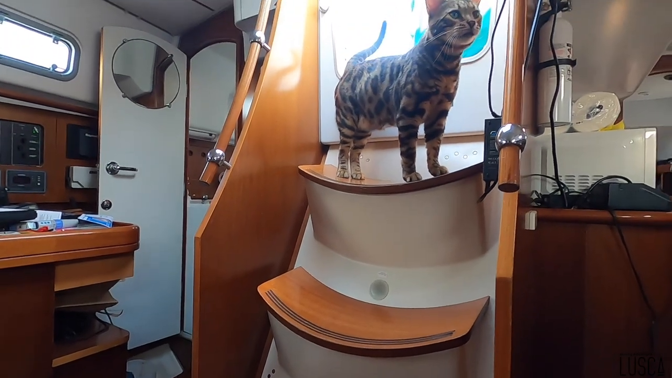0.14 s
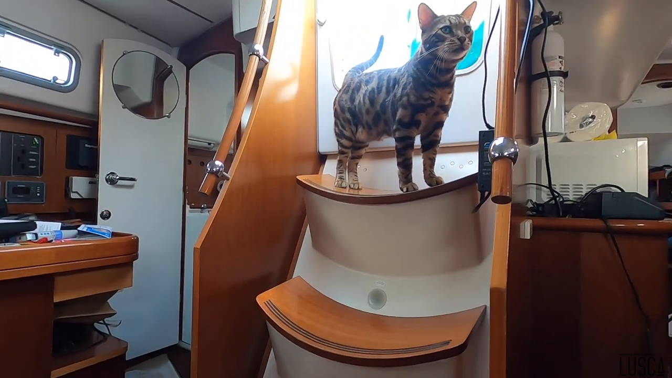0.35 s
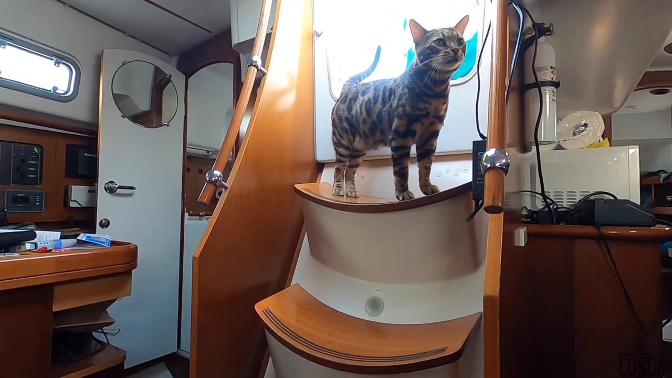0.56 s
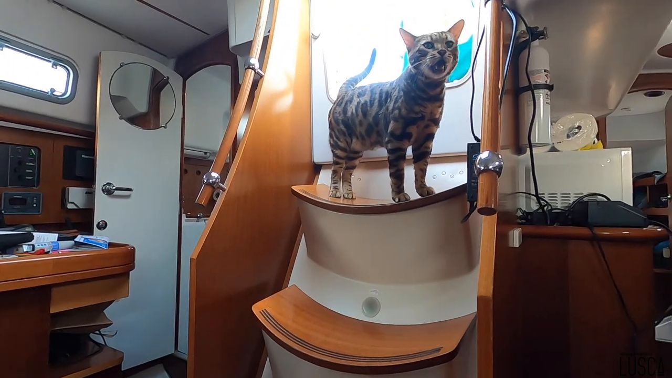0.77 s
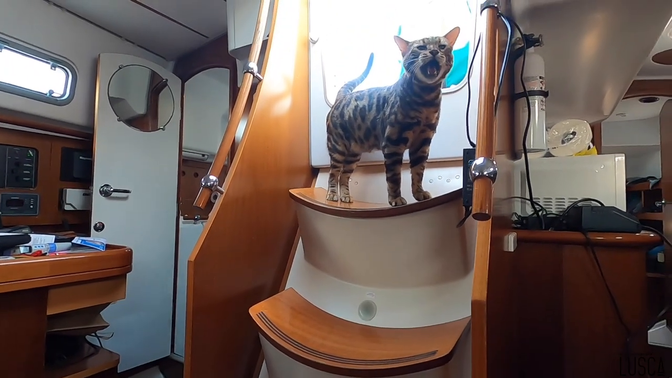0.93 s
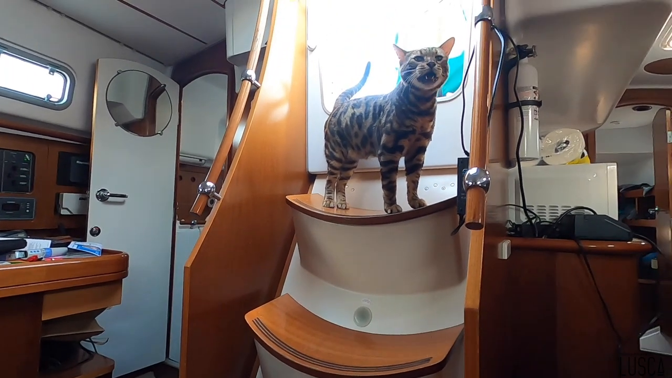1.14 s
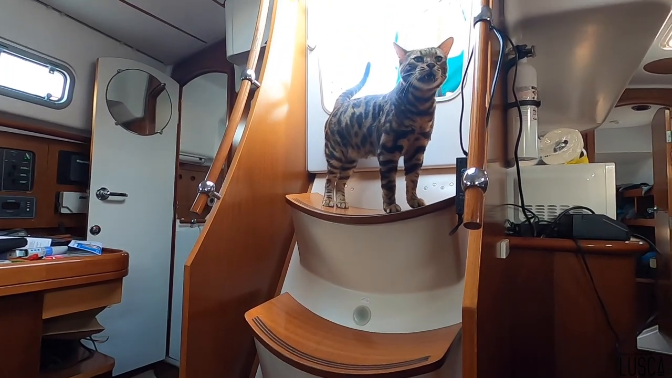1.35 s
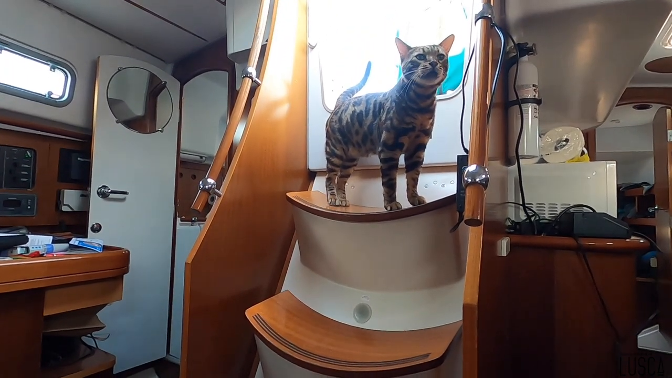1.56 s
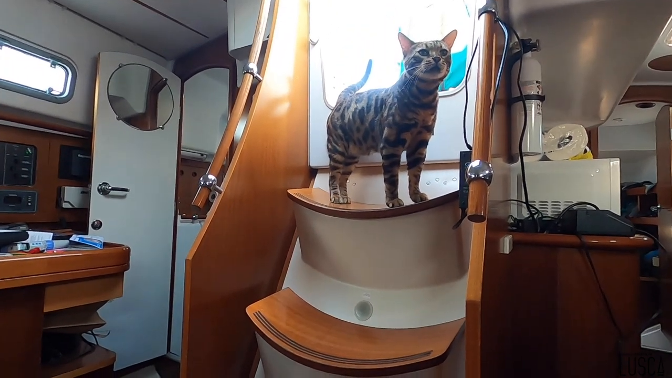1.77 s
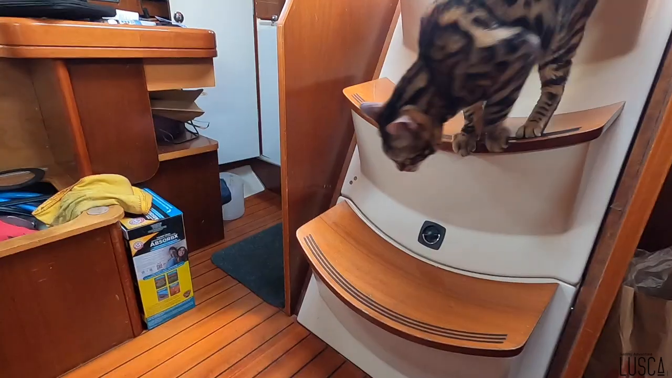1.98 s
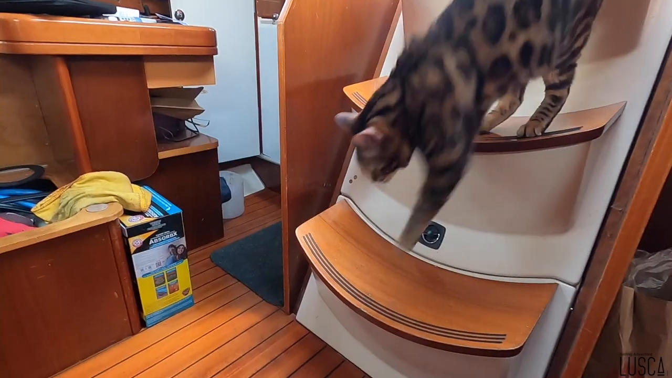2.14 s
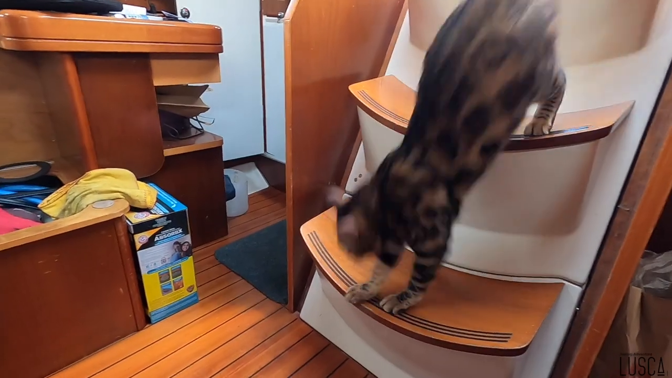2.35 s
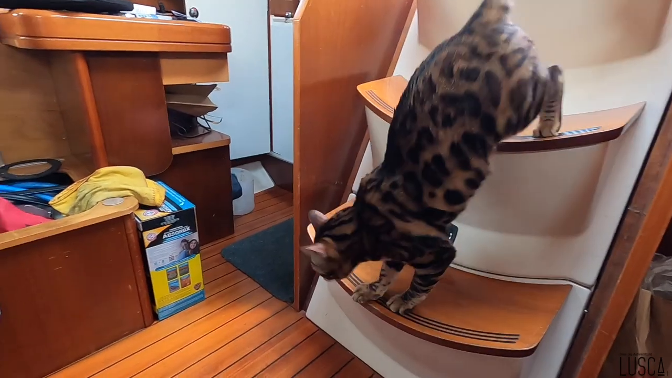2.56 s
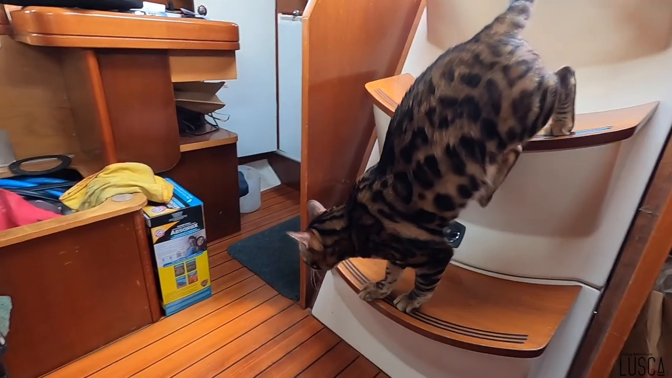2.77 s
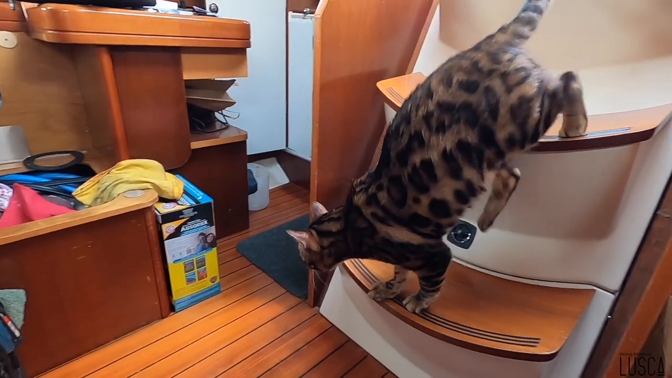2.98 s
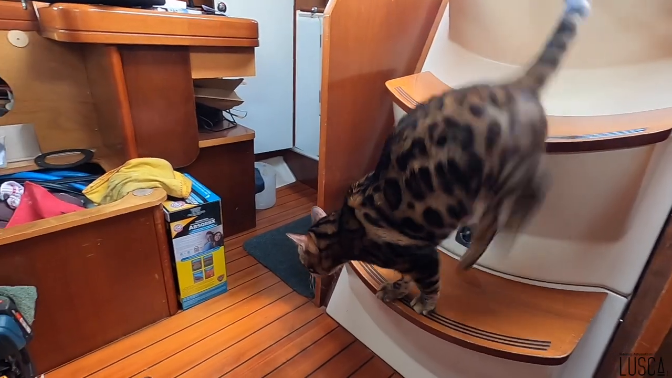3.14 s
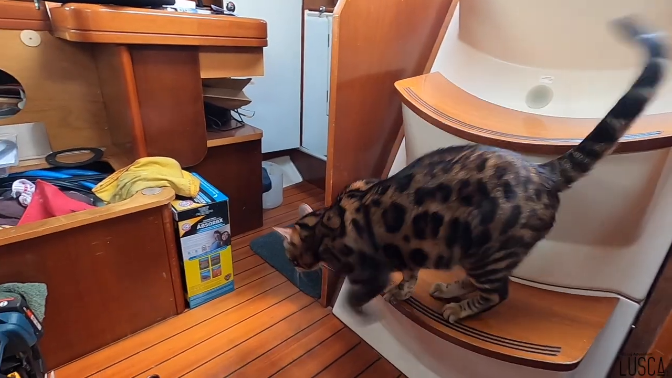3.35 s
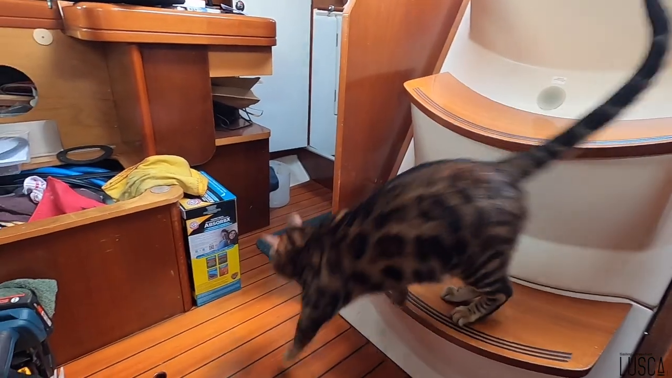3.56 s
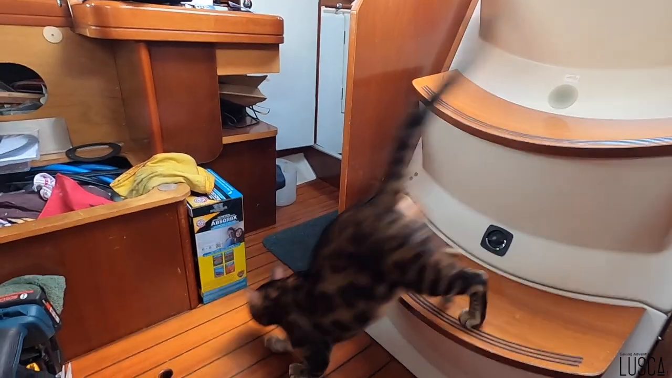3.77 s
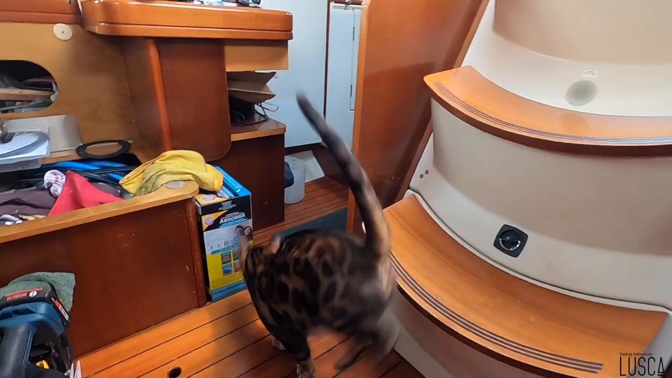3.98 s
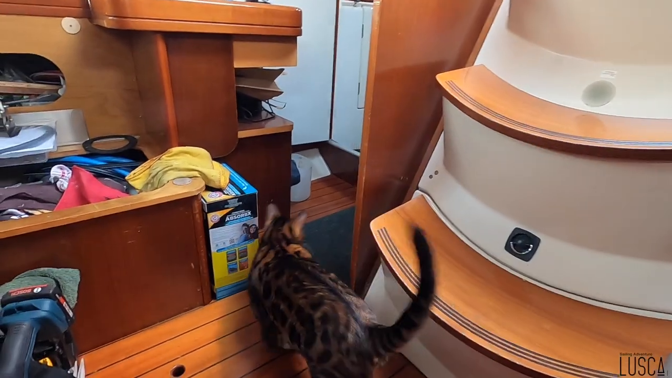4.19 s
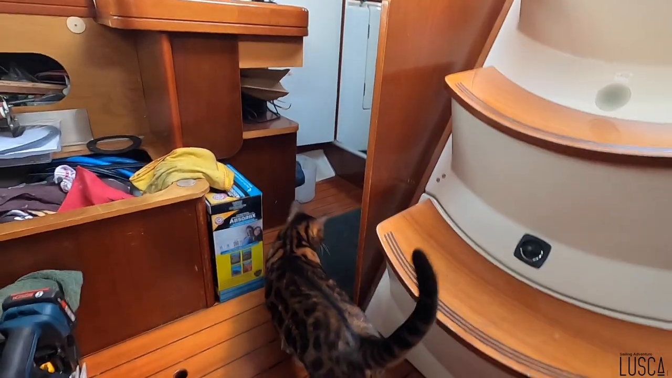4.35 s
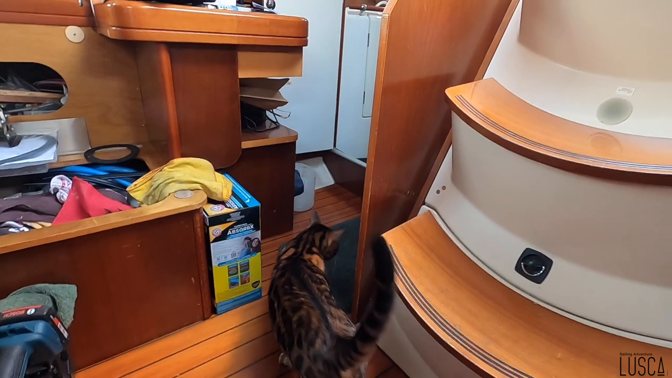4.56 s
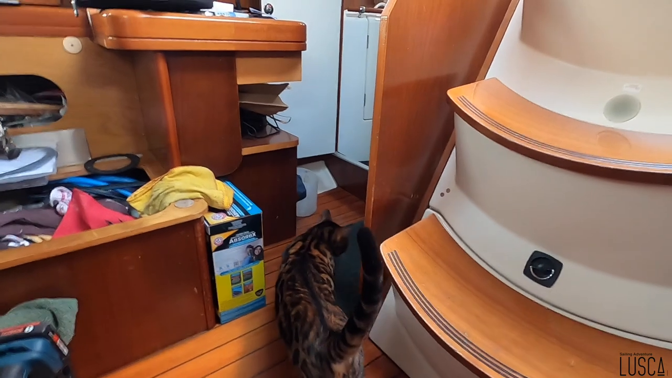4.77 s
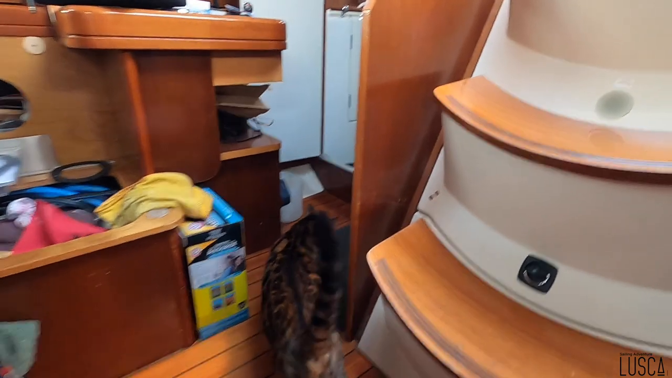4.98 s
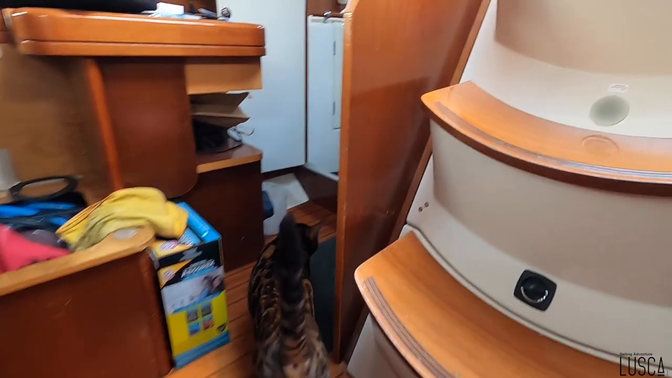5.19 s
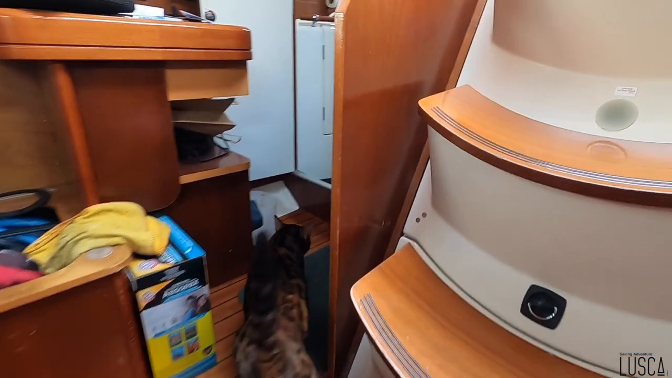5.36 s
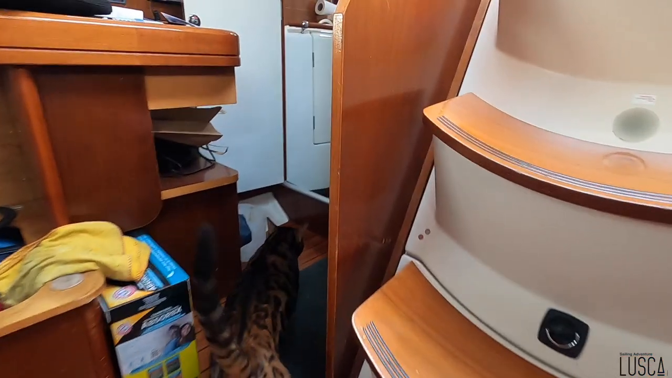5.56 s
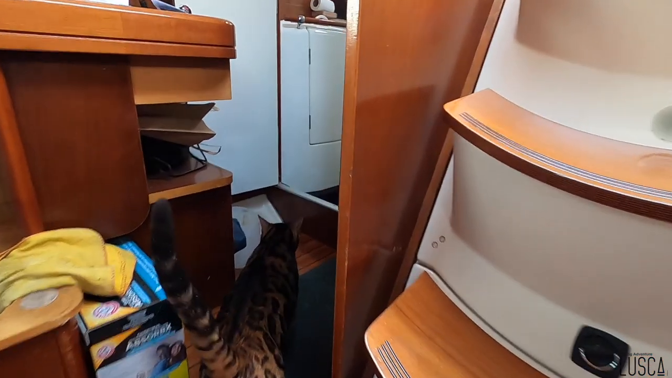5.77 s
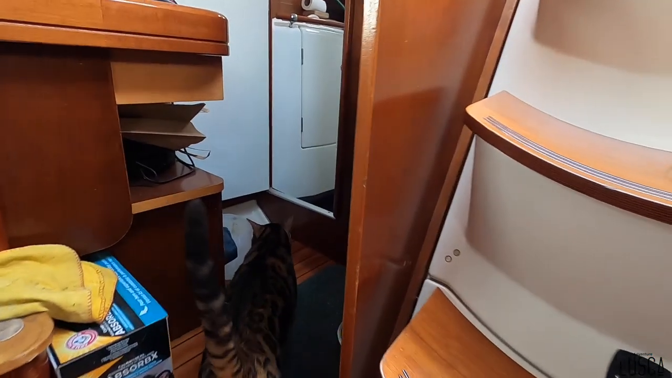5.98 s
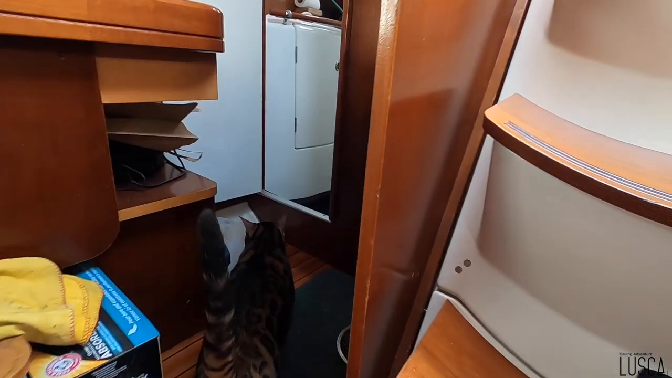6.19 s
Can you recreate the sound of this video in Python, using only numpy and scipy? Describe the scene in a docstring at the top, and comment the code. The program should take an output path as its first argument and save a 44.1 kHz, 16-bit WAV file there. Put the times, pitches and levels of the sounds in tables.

```python
"""One long meow rings in a small wooden boat cabin; after a short near-silence the cat climbs down the steps.
Paws thud on hollow boards (damped modes), claws and loose things tick, dry scrapes rasp, woodwork knocks.
The meow is a stack of harmonics through a moving mouth; a machine hums under coloured hiss and cloth rustle.
Handling rumbles in the bass, and the stereo picture folds nearly to mono for a while.
Source levels are set ahead of the final gain in record()."""
import sys
import numpy as np
from scipy import signal
from scipy.fft import rfft, irfft, next_fast_len
from scipy.io import wavfile
from scipy.ndimage import uniform_filter1d

SR = 44100
rng = np.random.default_rng(int(sys.argv[2]) if len(sys.argv) > 2 else 0)


def transcribe(signal):
    """Save signal, clipped to [-1, 1], as a 16-bit WAV file at the path in sys.argv[1]."""
    frames = np.atleast_2d(signal).T
    limited = np.clip(frames, -1, 1)
    pcm = np.round(limited * 32767).astype(np.int16)
    wavfile.write(sys.argv[1], SR, pcm)


N = 274724  # samples


def amp(db):
    """Decibels to linear gain."""
    return 10 ** (np.asarray(db) / 20)


def evened(x):
    """Scales a signal to an RMS of 1."""
    return x / np.sqrt(np.mean(x ** 2) + 1e-20)


def smooth_noise(count, size, passes=1):
    """Slow random drift at RMS 1: white noise averaged over size samples, once or more."""
    drift = rng.standard_normal(count)
    for _ in range(passes):
        drift = uniform_filter1d(drift, size)
    return evened(drift)


def levelled(x):
    """Takes out most of the chance swells of narrow noise."""
    envelope = abs(signal.hilbert(x, next_fast_len(N))[:N])
    return x / (envelope + .5)


def read(points, hz):
    """Value of a spectrum table on a log-frequency axis."""
    f, value = np.transpose(points)
    return np.interp(np.log(hz + 1), np.log(f + 1), value)


def along(rows):
    """Columns of a time curve, one value a sample."""
    s, *columns = np.transpose(rows)
    return [np.interp(np.arange(N) / SR, s, c) for c in columns]


def add(mix, s, sound):
    """Lays a sound into the mix at s seconds."""
    part = mix[round(s * SR):][:len(sound)]
    part += sound[:len(part)]


def peak(f, hz, width):
    """Complex gain of a resonance at frequency f, 1 at its centre."""
    return 1j * width * hz / (hz ** 2 - f ** 2 + 1j * width * f)


def band(x, hz, width):
    """A resonance applied twice."""
    b, a = signal.iirpeak(min(hz, SR / 2.2), hz / width, SR)
    return signal.lfilter(b, a, signal.lfilter(b, a, x))


def coloured(x, tone):
    """Filters by a spectrum table."""
    size = next_fast_len(N + 2048)
    gain = amp(read(tone, np.fft.rfftfreq(size, 1 / SR)))
    return irfft(rfft(x, size) * gain, size)[..., :N]


def noise(tone, patchy_db):
    """Two-channel noise of a given spectrum with drifting patches, its sides partly alike."""
    # left-right likeness: (frequency [Hz], correlation, held within -1 to 1)
    likeness = [(60, -0.65), (180, 0.34), (550, 0.063), (1650, -0.27), (4970, -0.37), (15000, -1.11)]
    frames, hz = N // 256 + 5, np.fft.rfftfreq(1024, 1 / SR)
    a, b, c, d, patches = rng.standard_normal((frames, 513, 5)).T
    patches = evened(uniform_filter1d(uniform_filter1d(patches, 12, 0), 14, 1))
    same = np.clip(read(likeness, hz), -1, 1)[:, None]
    left, other = a + 1j * b, c + 1j * d
    z = np.array([left, same * left + np.sqrt(1 - same ** 2) * other])
    z *= amp(read(tone, hz)[:, None] + patchy_db * patches)
    return evened(signal.istft(z, nperseg=1024, noverlap=768)[1][:, :N])


def hiss():
    """The cabin's constant floor: wide noise with a strong low end."""
    # spectrum shape: (frequency [Hz], relative level [dB per Hz])
    hiss_tone = [(35, -16), (60, 9), (96, -9.5), (200, -1), (268, -12.5), (492, -20), (636, -24.5),
                 (903, -21), (1140, -22), (1340, -19.5), (1950, -17.5), (3000, -26), (5860, -37),
                 (7400, -33.5), (9000, -43), (11000, -64.5), (16000, -92.5)]
    return amp(-47.5) * noise(hiss_tone, patchy_db=1.96)


def rustle():
    """Cloth brushing: mid-heavy patchy noise that swells and fades."""
    # strength of the brushing: (time [s], level [dB])
    brushing = [(2, -63), (2.1, -43.5), (2.25, -51.5), (2.9, -68), (3.55, -60), (4.3, -70), (4.75, -55.5),
                (5, -74), (5.45, -53), (5.6, -67.5), (5.95, -60), (6.1, -48), (6.23, -46.5)]
    # spectrum shape: (frequency [Hz], relative level [dB per Hz])
    cloth_tone = [(150, -25), (350, -3), (600, 0), (900, -7), (2000, -12), (5000, -30), (10000, -55)]
    return amp(along(brushing)[0]) * noise(cloth_tone, patchy_db=3.5)


def hum():
    """A machine tone that wavers a little, and its fan's noise through two resonances."""
    # machine tone: (time [s], pitch [Hz], level [dB])
    machine = [(0, 233.5, -47), (.8, 235.9, -48), (1.3, 232.7, -54), (2, 235.8, -45), (4.2, 236.6, -51),
               (5, 234.4, -46), (6.23, 238.5, -52)]
    # resonances of the fan noise: (centre [Hz], width [Hz], level [dB])
    drones = [(655, 60, -66), (1160, 70, -65)]
    hz, db = along(machine)
    waver = smooth_noise(N, 3000)
    phase = 2 * np.pi * np.cumsum(hz) / SR + 0.49 * waver
    tone = np.sqrt(2) * amp(db + 1.0 * waver) * np.sin(phase)
    fan = sum(amp(db) * evened(band(rng.standard_normal(N), f, width)) for f, width, db in drones)
    return tone + fan


def bass_noise(low_hz, high_hz):
    """Narrow low noise at RMS 1."""
    sos = signal.butter(3, (low_hz, high_hz), "bandpass", fs=SR, output="sos")
    return evened(signal.sosfilt(sos, rng.standard_normal(N)))


def rumble():
    """Lumpy bass from the hand holding the microphone, with grip jolts and rubbing of the right port."""
    # handling at both ports: (time [s], level [dB])
    handling = [(0, -51.5), (1.8, -44), (2.0, -37), (2.6, -38.5), (2.9, -48), (3.5, -42), (4.0, -53.5),
                (4.7, -52), (5.3, -49), (6.23, -48.5)]
    # the hand shifts its grip: (time [s], peak [dB], half length [s])
    jolts = [(0.347, -44, 0.027), (0.7, -41, 0.011), (0.882, -24.5, .025), (1.742, -39, 0.028),
             (2.08, -29.5, 0.036), (2.465, -32, 0.062), (3.15, -45, .06), (3.68, -19.5, 0.019),
             (3.749, -19.5, .022), (3.818, -27, 0.043), (4.191, -32.5, 0.041), (4.83, -46, .04),
             (5.08, -51, 0.026), (5.36, -44, 0.056), (5.994, -48, 0.027)]
    # rubbing at the right port only: (time [s], level [dB])
    rubbing = [(.2, -52), (.25, -44), (.4, -57), (.83, -57.5), (.92, -32), (1.3, -35), (1.7, -28.5),
               (1.8, -47)]
    # finger on the right port: (time [s], peak [dB], half length [s], direction [sign])
    bumps = [(.875, -14.5, 0.0057, -1), (1.734, -13, 0.0023, -1), (1.741, -14, 0.0007, 1),
             (1.758, -19.5, 0.0051, -1)]
    t = np.arange(N) / SR
    both = evened(levelled(bass_noise(18, 48)))
    right = bass_noise(7.3, 15) * amp(along(rubbing)[0])
    for s, db, half, way in bumps:
        u = (t - s) / half
        right += np.sign(way) * amp(db) * (1 - .5 * u ** 2) * np.exp(-u ** 2 / 2)  # a push with rebound
    lumps_db = 1.5 * smooth_noise(N, 2500, passes=2)  # chance swells
    grip = amp(along(handling)[0] + lumps_db)
    for s, db, half in jolts:
        grip += amp(db) * np.exp(-((t - s) / half) ** 2)
    return both * grip + np.array([[0], [1]]) * right


def cabin(x, tail_db):
    """A few wall echoes, then sparse taps of random sign, each band dying at its own speed."""
    # early wall echoes: (delay [s], left [dB], right [dB])
    echoes = [(.0031, -11.5, -13), (.0057, -12, -17), (.0089, -5, -18), (0.013, -17.5, -9),
              (.019, -14, -14.5)]
    # decay of the tail: (frequency [Hz], t60 [s])
    decay = [(250, 0.48), (660, 0.16), (1740, 0.2), (4590, 0.21)]
    taps = np.zeros((2, SR // 2))
    at = np.arange(300, SR // 2 - 20, 20) + rng.integers(0, 20, (2, (SR // 2 - 301) // 20))
    np.put_along_axis(taps, at, rng.choice([-1., 1.], at.shape), 1)
    hz, t, z = signal.stft(taps, SR, nperseg=256)
    fade = amp(-60 * t / read(decay, hz)[:, None])
    tail = signal.istft(z * fade, SR, nperseg=256)[1]
    tail *= amp(tail_db) / np.linalg.norm(tail[0])
    for s, left_db, right_db in echoes:
        tail[:, round(s * SR)] += amp([left_db, right_db])
    return signal.fftconvolve(x[None], tail, axes=1)[:, :N]


def knocks():
    """Something hard knocks on woodwork: a dense crunch of grainy noise whose top treble dies sooner."""
    # knocks: (time [s], level [dB], t60 below the top treble [s])
    hits = [(5.224, -33.5, 0.14), (5.718, -20.5, 0.13), (5.73, -13, 0.17), (5.826, -38, 0.13)]
    # spectrum shape: (frequency [Hz], relative level [dB per Hz])
    wood_tone = [(150, -34), (250, -12), (351, -4.5), (413, -7), (728, -5.5), (913, -20), (1060, -11),
                 (1220, -8.5), (1990, -16.5), (4540, -25.5), (12000, -43.5), (15600, -83.5), (22000, -120)]
    body, top, t = np.zeros(N), np.zeros(N), np.arange(12000) / SR
    for s, db, t60 in hits:
        add(body, s, amp(db - 60 * t / t60) * np.minimum(t / 0.0033, 1))
        add(top, s, amp(db - 90 * t / t60) * np.minimum(t / 0.009, 1))
    grains = amp(1.7 * smooth_noise(N, 130))  # random grain in the loudness
    crunch = grains * noise(wood_tone, patchy_db=3.5)
    low = coloured(crunch, [(6000, -2), (9000, -18)])
    return body * low + top * (crunch - low)


def scrapes():
    """Dry scrapes close to the microphone: grainy noise, low body and ringing treble, that swells and stops short."""
    # strokes: (time [s], length [s], level [dB], centre [Hz], treble against the centre [dB])
    strokes = [(2.053, 0.075, -50.5, 2180, -9.5), (3.555, 0.13, -52.5, 2450, -7.5),
               (3.714, 0.062, -48, 1750, -30), (3.834, 0.037, -41, 2320, -1), (4.425, 0.065, -52, 2460, -3),
               (4.739, 0.074, -51.5, 3180, -8), (6.164, 0.059, -50, 1490, -10)]
    out = np.zeros(N)
    for s, length, db, hz, treble_db in strokes:
        grains = rng.standard_normal(8000) * amp(4.0 * smooth_noise(8000, 80))
        centre, body = evened(band(grains, hz, 830)), evened(band(grains, 900, 990))
        treble = evened(band(grains, 3120, 1000) + band(grains, 4950, 370) + band(grains, 5780, 470))
        u = np.arange(8000) / SR / length
        stroke = np.sqrt(u) * np.clip((1 - u) / 0.18, 0, 1)
        add(out, s, amp(db) * stroke * (centre + amp(-3) * body + amp(treble_db) * treble))
    return out


def ticks():
    """Claws and loose things: short noise bursts with a resonant centre, a bright edge and a woody body."""
    # ticks: (time [s], peak of the centre [dB], centre [Hz], treble [dB], body [dB]), last two against the centre
    clicks = [(2.3308, -28.5, 1400, -34, 0.5), (2.3436, -33.5, 1531, -8, 8), (2.357, -27.5, 1230, -18, -16),
              (2.386, -38.5, 1710, -5, 7.5), (3.118, -37, 1220, -39, 3), (3.299, -36, 1270, -27, 6),
              (3.6477, -27, 1550, -10, 1), (3.688, -37, 1510, 0.5, 7), (3.706, -35, 1730, -6, -8),
              (3.8079, -31.5, 1500, -9, 6), (3.9872, -31.5, 2700, -12, -1), (4.103, -28, 1760, -18.5, 1.5),
              (4.13, -34, 1000, -37, 2), (4.788, -42.5, 2940, -15, 7), (4.917, -52, 1310, 7.5, -9),
              (4.936, -48, 1357, 10, -21.5), (5.144, -43.5, 2270, -4, -20), (5.192, -41, 1950, -9, 1),
              (5.223, -20, 1980, -9.5, -6.5), (5.2433, -37, 2300, 7, 4.5), (5.283, -34.5, 2200, -6, -22),
              (5.293, -33, 2000, -4, -22), (5.313, -35, 2000, -5, -22), (5.341, -33, 2205, -10, -30),
              (5.3578, -38, 2210, -5, -22), (5.378, -33, 2160, -5, -28), (5.411, -32.5, 2170, -6, -22),
              (5.677, -41, 2330, -3, -7), (5.729, -13, 1860, -0.5, 2.5), (5.8262, -36, 1700, -18, 8.5),
              (5.9811, -41.5, 1294, -4, -15)]
    rise_s, fall_s = 0.0039, 0.0057  # linear rise; time constant of the fall
    out, t = np.zeros(N), np.arange(3000) / SR
    for s, db, hz, treble_db, body_db in clicks:
        burst = rng.standard_normal(len(t)) * np.exp(-t / fall_s) * np.minimum(t / rise_s, 1)
        parts = band(burst, hz, 890), band(burst, 3400, 1200), band(burst, 720, 790)
        gains_db = 0, treble_db, body_db
        add(out, s, amp(db) * sum(amp(g) * p / abs(p).max() for g, p in zip(gains_db, parts)))
    return out


def thuds():
    """A soft push rings the board modes, most those of the spot struck; harder paws reach the upper ones."""
    # paws and feet on hollow boards: (time [s], level [dB], hardness [dB per octave], pitch of the spot [Hz])
    landings = [(2.072, -32, 4.5, 86), (2.329, -29.5, 2.5, 240), (2.391, -19, -1, 108),
                (3.12, -37, 10, 242), (3.297, -34, 3, 106), (3.665, -12, 2, 125), (3.689, -12, 4, 104),
                (3.792, -19.5, -1, 98.2), (4.119, -16.5, -5, 145), (4.727, -36, 2.5, 244),
                (4.836, -33, 0, 116), (5.351, -34.5, 2, 105), (5.41, -27, -6, 110), (5.458, -32, 9, 115),
                (5.729, -17, -2, 221.5), (5.829, -29.5, 6.5, 108), (6.093, -30.5, 7, 205),
                (6.17, -31, -0.5, 157), (6.198, -29, 4.5, 160)]
    # modes of the boards: (frequency [Hz], relative level [dB], t60 [s])
    boards = [(66.6, -22, 0.062), (108, 1, 0.16), (157.3, -9, 0.17), (217.4, -3.5, 0.04),
              (309.8, -6.5, 0.13), (493.7, -18.5, 0.092), (667, -27, 0.049), (913, -36.5, 0.015)]
    contact_s = 0.022  # how long a pad presses; the push peaks at a third of it
    out, t = np.zeros(N), np.arange(9000) / SR
    push = t * np.exp(-t / (contact_s / 3))
    for s, db, hard_db, spot_hz in landings:
        ring = np.zeros(len(t))
        for hz, level_db, t60 in boards:
            octaves = np.log2(hz / spot_hz)
            reach_db = hard_db * octaves + 9 * np.exp(-(octaves / 0.15) ** 2)
            # fed by the push, drained by damping
            swell = signal.lfilter([1], [1, -amp(-60 / (t60 * SR))], push)
            wobble = smooth_noise(len(t), 300, passes=2)
            phase = 2 * np.pi * (hz * t + rng.random()) + .5 * wobble  # slight random wobble of each mode
            ring += amp(level_db + reach_db) * swell / swell.max() * np.sin(phase)
        loudest = np.sqrt(2 * uniform_filter1d(ring ** 2, size=900).max())
        add(out, s - .008, amp(db) * ring / loudest)
    return out


def meow():
    """Vocal-fold harmonics, breathy at both ends, shaped by the resonances of a mouth that opens and closes."""
    # the call: (time [s], level [dB], pitch [Hz], mouth resonance [Hz])
    call = [(.81, -28.5, 317.8, 1500), (.835, -24, 349.7, 1494), (.864, -17.5, 409, 1710),
            (.905, -17.5, 452.8, 1820), (0.929, -10, 481.7, 1860), (1.0, -11, 500, 1930),
            (1.076, -8, 506.2, 2110), (1.138, -10.5, 507.3, 1910), (1.177, -10.5, 498.4, 1560),
            (1.279, -12.5, 483.8, 1316), (1.396, -13, 472.1, 1390), (1.456, -19.5, 466.3, 1363),
            (1.504, -17.5, 459.5, 1144), (1.576, -31, 445.5, 878), (1.646, -16.5, 441.4, 889),
            (1.672, -28.5, 443.6, 860), (1.695, -13, 431.8, 875), (1.715, -32.5, 413, 810),
            (1.751, -40, 392, 780)]
    # rest of the tract: (time [s], tongue resonance [Hz], tongue [dB], pharynx [dB], upper throat [dB])
    tract = [(.81, 2290, -9.5, -0.5, -43.5), (.93, 2650, -17.5, -11.5, -43), (1.02, 2515, -20.5, -11, -39),
             (1.14, 2463, -14.5, -15, -33.5), (1.33, 2480, -25, -16, -32.5),
             (1.5, 2420, -23.5, -18.5, -35.5), (1.64, 2270, -23, -10, -45), (1.7, 2004, -6, -23.5, -41),
             (1.75, 1970, -2, -9, -46.5)]
    # upper throat with the mouth resonance at 2000 Hz: (centre [Hz], width [Hz], relative level [dB])
    throat = [(3360, 630, 1), (4620, 680, 5.5), (5590, 900, -0.5), (7360, 430, -11.5)]
    level_db, hz, mouth_hz = along(call)
    tongue_hz, tongue_db, pharynx_db, upper_db = along(tract)
    t = np.arange(N) / SR
    since, until = t - call[0][0], call[-1][0] - t
    # breathiness settles after the onset (0.07 s) and returns at the close (0.045 s)
    breathy = .011 + .055 * (np.exp(-abs(since) / .07) + np.exp(-abs(until) / .045))
    jitter = smooth_noise(N, 300)
    turns = np.cumsum(hz * (1 + 0.0018 * jitter)) / SR
    sink = (mouth_hz / 2000) ** 0.089  # the upper resonances sink a little as the mouth closes
    low, high, low_power, high_power = np.zeros((4, N))
    for k in range(1, 19):
        # breath smears each harmonic into a skirt of noise, the higher ones more; each also wavers alone
        fuzz = 1 + breathy * k * smooth_noise(N, 170)
        waver = amp(0.41 * k * smooth_noise(N, 1500, passes=2))
        tone = fuzz * waver * np.exp(2j * np.pi * k * turns)
        front = peak(k * hz, mouth_hz, 480) ** 2
        front -= amp(tongue_db) * peak(k * hz, tongue_hz, 380) ** 2
        front += amp(pharynx_db) * peak(k * hz, 1044, 340) ** 2
        front *= amp(-8 * (k == 1))  # a small head radiates the fundamental weakly
        back = sum(amp(db) * peak(k * hz, f * sink, width) ** 2 for f, width, db in throat)
        low += (tone * front).real
        high += (tone * back).real
        low_power += abs(front) ** 2 / 2
        high_power += abs(back) ** 2 / 2
    sounding = np.clip(since / 0.0073, 0, 1) * np.clip(until / 0.015, 0, 1)
    lower = amp(level_db) * low / np.sqrt(low_power)
    upper = amp(upper_db) * high / np.sqrt(high_power)
    return sounding * (lower + upper)


def scene():
    """Everything in the cabin, as the two microphone ports hear it."""
    # treble softening of the cat and the steps: (frequency [Hz], gain [dB])
    softening = [(3000, -3.5), (6000, -6.5), (8000, -3.5), (10000, -11.5), (16000, -34)]
    voice = meow()
    direct = np.array([np.roll(voice, shift=2), voice])  # the cat sits slightly nearer the right port
    cat = direct + amp(-6.5) * cabin(voice, tail_db=-1.0)
    clicks = ticks()
    steps = thuds() + scrapes() + clicks + amp(-9) * cabin(clicks, tail_db=3.5)
    return coloured(cat + steps, softening) + knocks() + hiss() + rustle() + hum() + rumble()


def record(dry):
    """Stereo width, the final gain with its near-silent gap, full-scale clipping and the band limit."""
    # left-right difference kept: (time [s], gain [dB])
    width = [(1.9, -1), (2, -58), (5, -54.5), (5.2, -26), (5.6, -19), (5.9, -14), (6.23, -12)]
    # final gain, an abrupt cut to near-silence, then a quick fade in: (time [s], gain [dB])
    gap = [(1.7, 5), (1.805, 9), (1.809, -59), (1.95, -72), (2.0, -26), (2.04, 4), (2.08, 6.5)]
    mid = dry.mean(0)
    side = (dry[0] - dry[1]) / 2 * amp(along(width)[0])
    pair = np.clip(np.array([mid + side, mid - side]) * amp(along(gap)[0]), -1, 1)
    low_pass = signal.firwin(511, 16500, window=("kaiser", 9), fs=SR)  # cutoff in Hz
    return signal.oaconvolve(pair, low_pass[None], "same")


dry = scene()
out = record(dry)
transcribe(out)
```